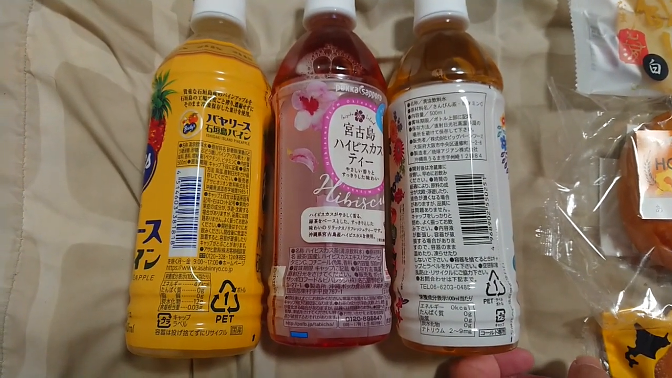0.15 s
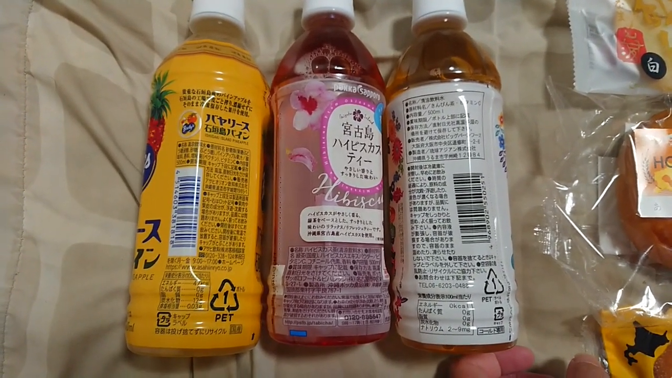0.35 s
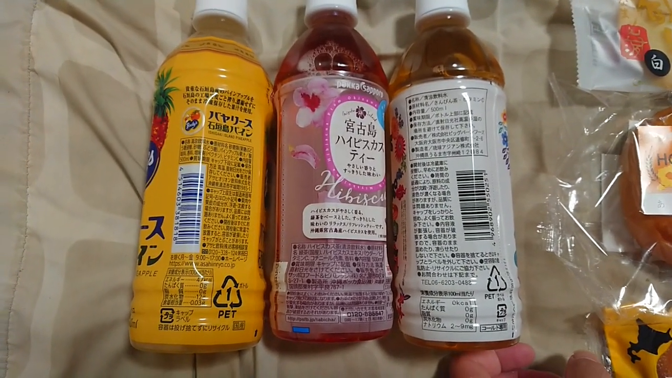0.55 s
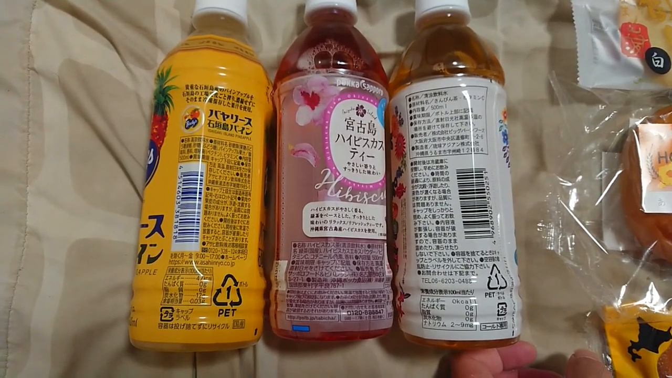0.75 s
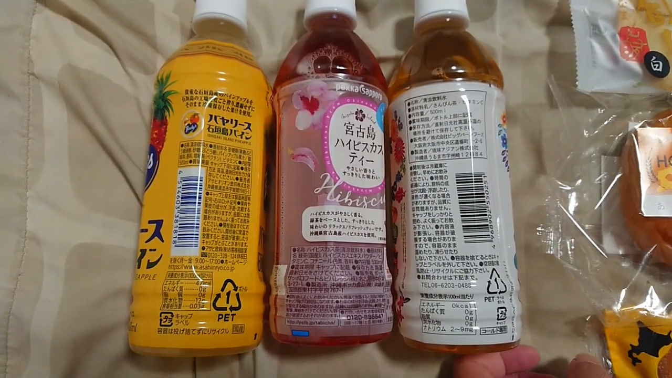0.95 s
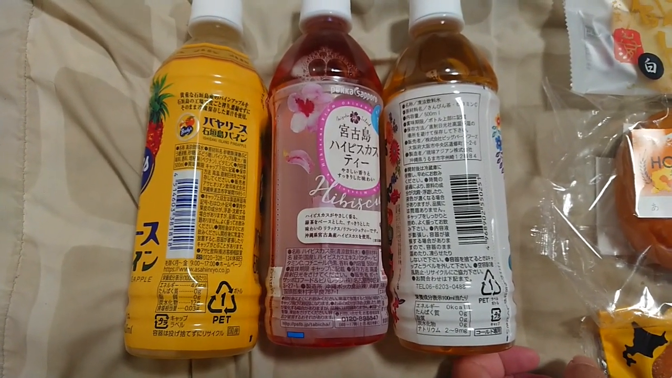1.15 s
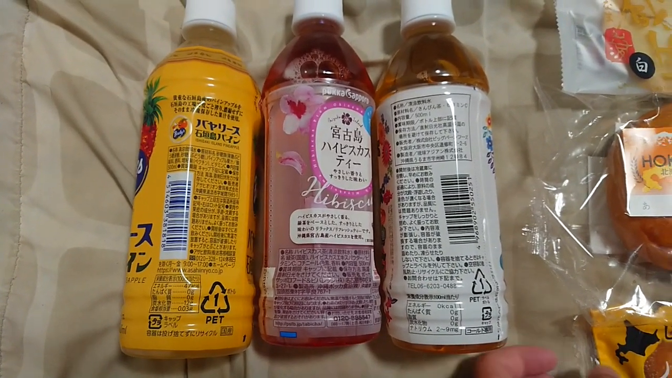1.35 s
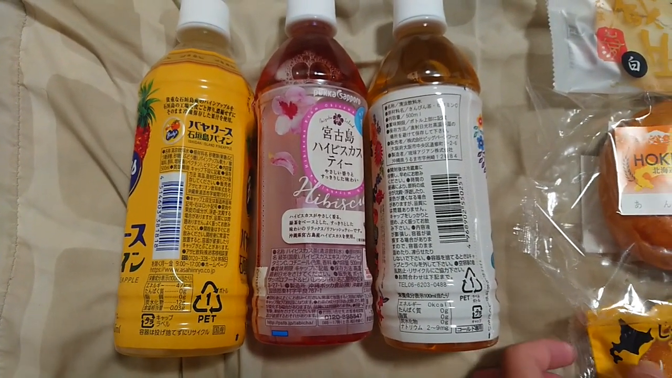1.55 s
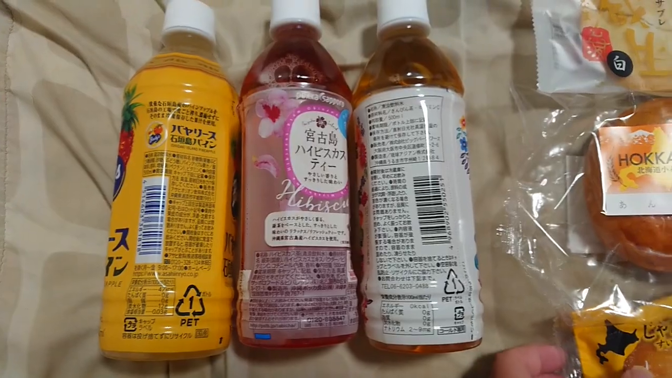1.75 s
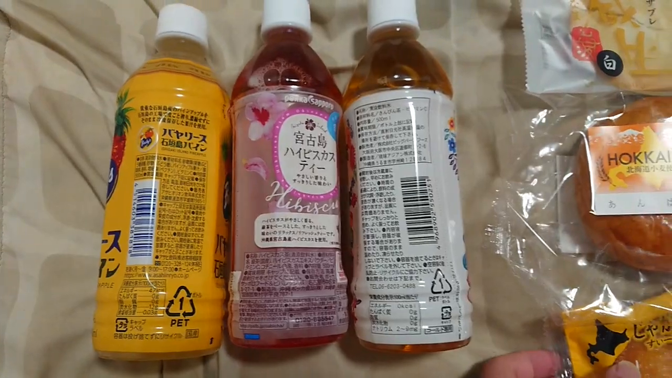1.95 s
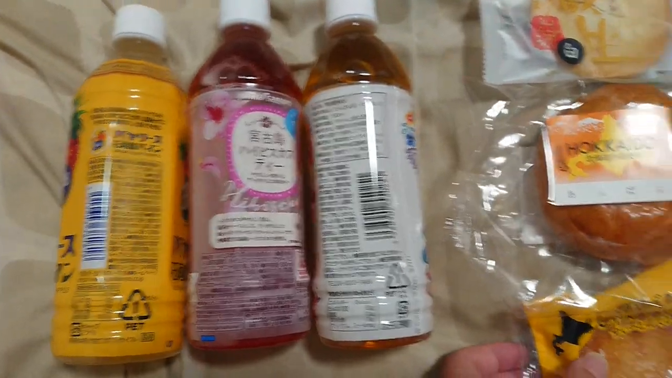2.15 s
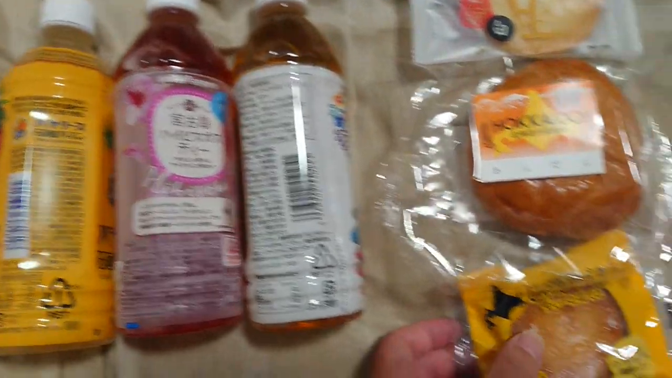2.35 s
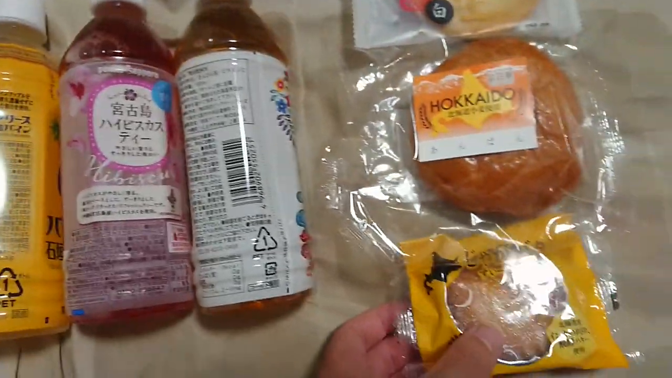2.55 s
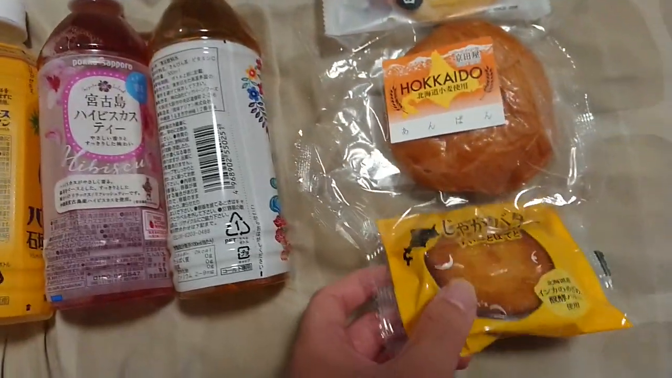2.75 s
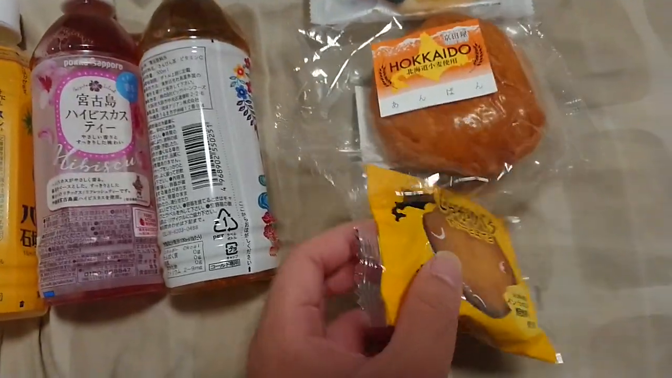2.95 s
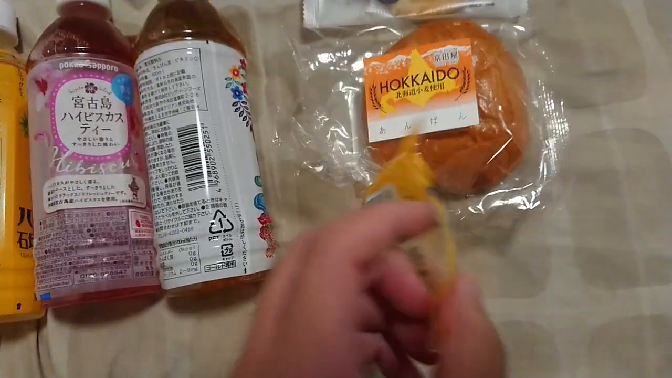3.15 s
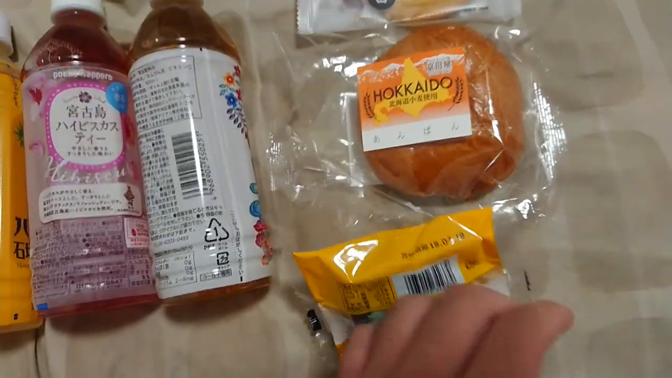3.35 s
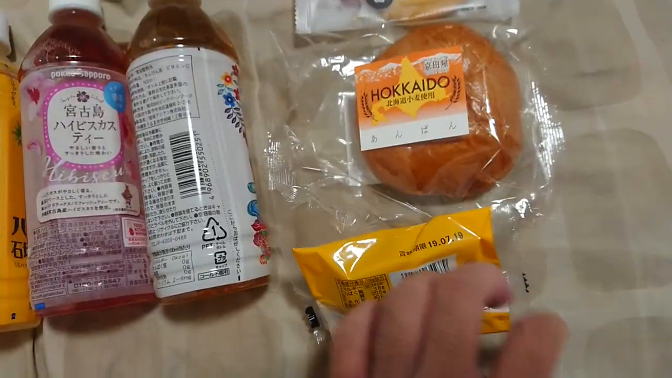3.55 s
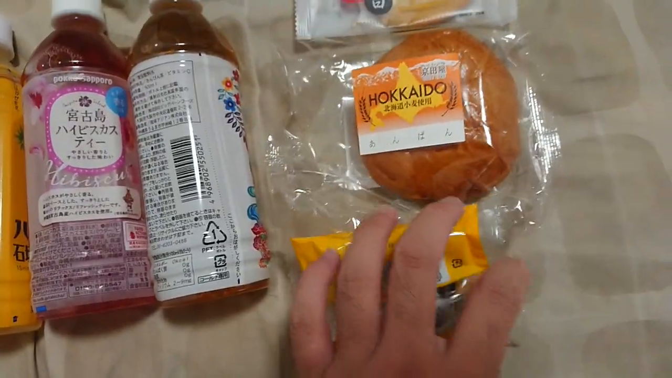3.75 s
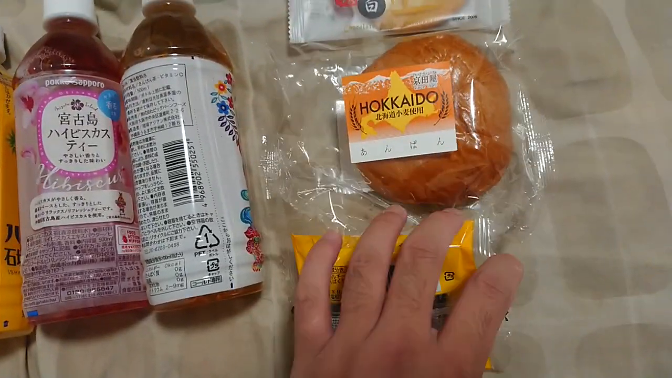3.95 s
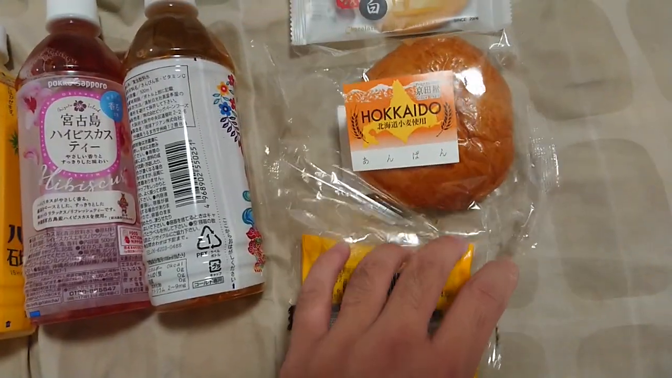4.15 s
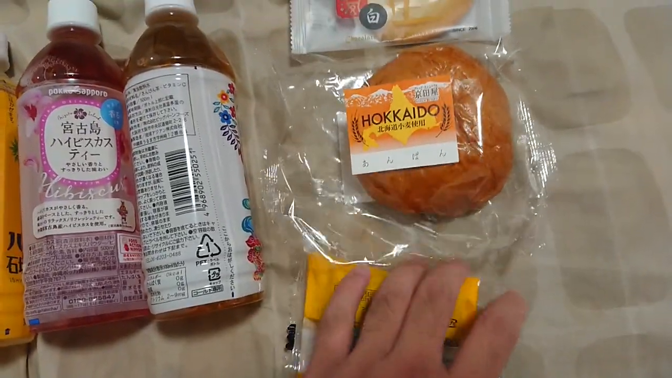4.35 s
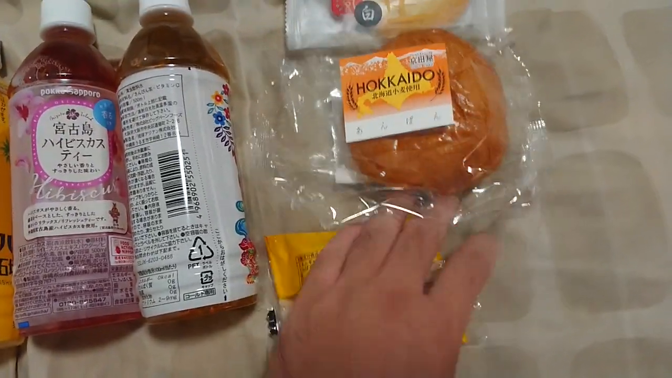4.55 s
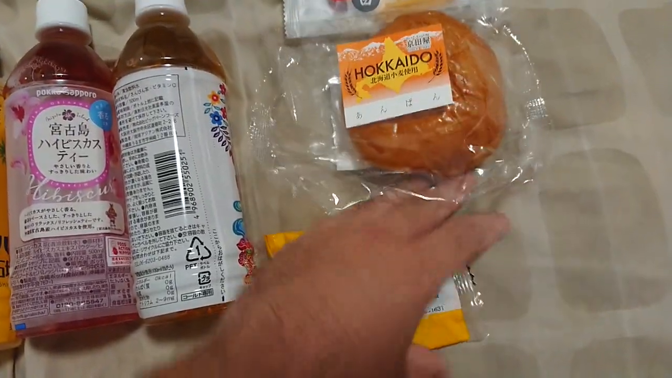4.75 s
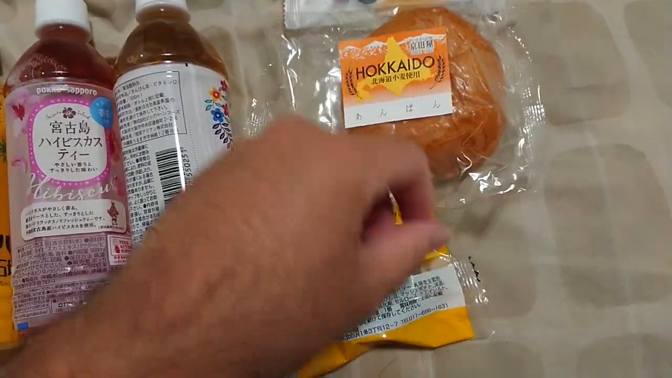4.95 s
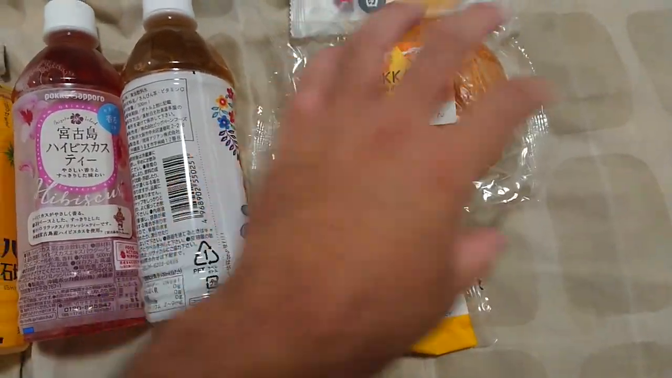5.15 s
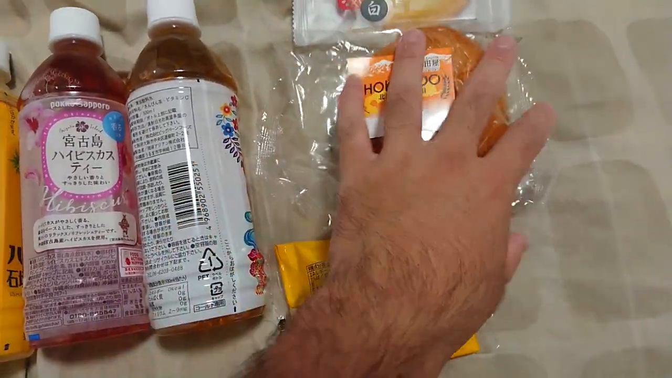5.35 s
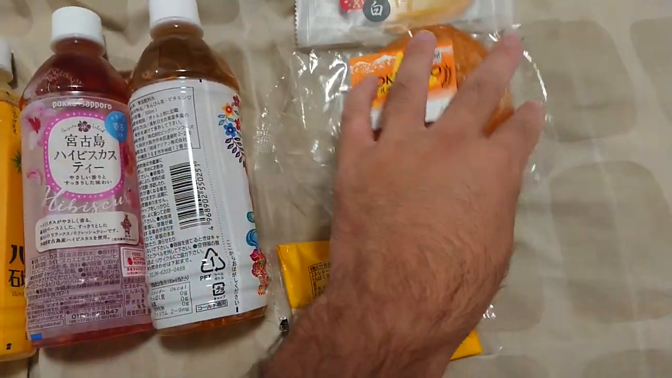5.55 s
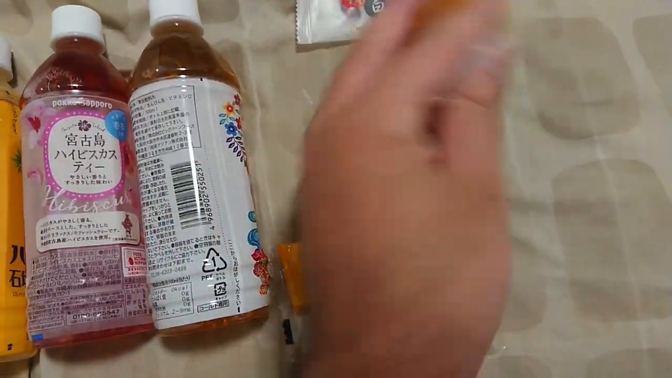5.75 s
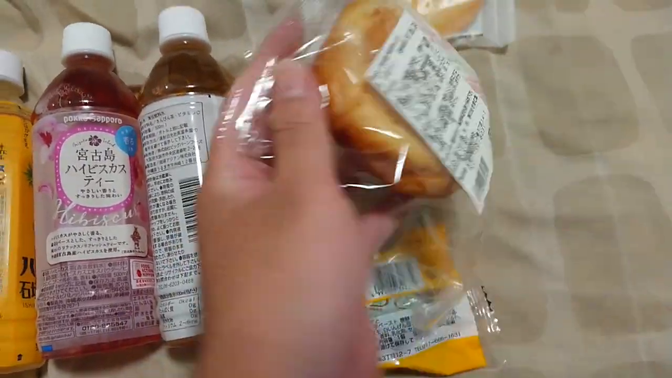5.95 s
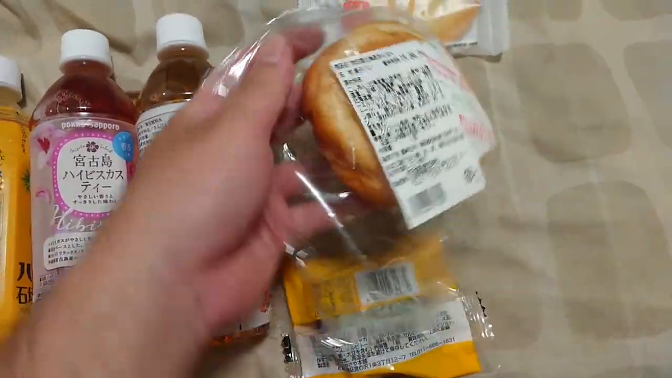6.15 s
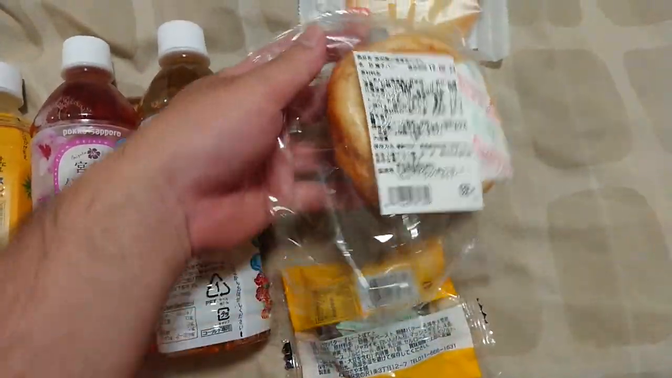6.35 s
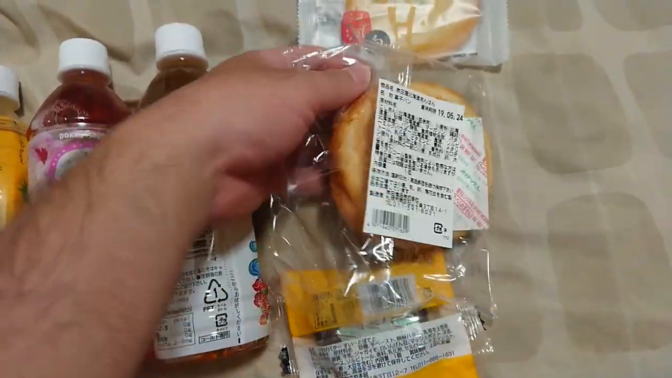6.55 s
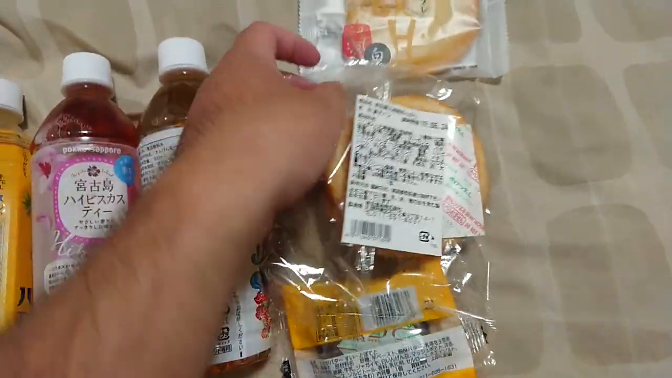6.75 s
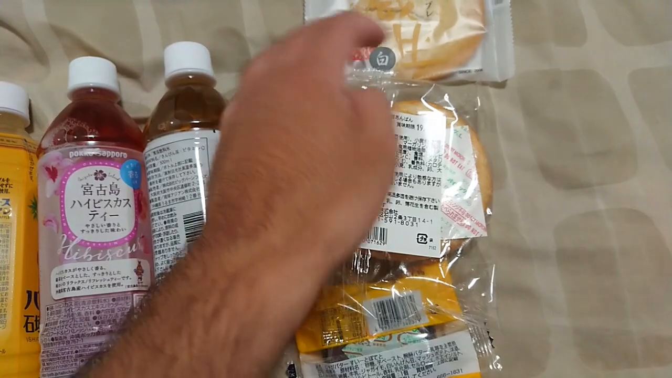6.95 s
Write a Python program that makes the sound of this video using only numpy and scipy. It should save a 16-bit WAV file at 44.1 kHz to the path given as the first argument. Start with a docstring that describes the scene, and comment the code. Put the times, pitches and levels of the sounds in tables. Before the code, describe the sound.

Close, dry crinkling of thin plastic packets on bedding. It starts nearly silent, a faint sliding hiss grows, then crisp snaps and fine crackle come in irregular clusters as a cake is turned and pressed. It nearly stops around five seconds, then a larger bag crackles fiercely with a tiny squeak, and thins out. Short room echoes; left microphone open, right one covered.

```python
"""Plastic film buckles in sharp snaps over a bed of fine crackle, as a hand turns over a wrapped small cake,
then grabs and flips a bun in a thin film bag. Each buckle is a short filtered burst of noise.
Filtered noise also makes the rubbing and a sliding hiss; gliding overtones make a fingertip squeak.
Swelling low tones are the packets bumping softly on the bedding. A small furnished room adds echoes,
faint rumble and hiss. The right microphone is almost completely covered, so it hears a muffled trace."""
import sys
import numpy as np
from scipy import signal
from scipy.fft import rfft, irfft
from scipy.io import wavfile
from scipy.ndimage import uniform_filter1d

SR = 44100
rng = np.random.default_rng(int(sys.argv[2]) if len(sys.argv) > 2 else 0)


def dump_mix(stems):
    """Bounce the given channels to the path in sys.argv[1] as a 16-bit WAV at rate SR."""
    frames = np.atleast_2d(stems).T  # one column per channel
    limited = np.clip(frames, -1, 1)  # hard clip at full scale
    pcm = np.round(limited * 32767).astype(np.int16)
    wavfile.write(sys.argv[1], SR, pcm)


N = 312669
TIME = np.arange(N) / SR   # seconds

# large, slack areas of film give off more bass: time_s [s], bass_lift_db [dB, relative]
SLACK_FILM = [(1.5, 29.5), (2.5, 21.5), (2.85, 15), (3.15, 12), (4.1, 9.5), (4.5, 12), (5.45, 11),
              (5.75, 14.5), (5.95, 15.5), (6.5, 11.5)]
# colour of the film noise at the open microphone: pitch_hz [Hz], level_db [dB per Hz, relative]
FILM_COLOUR = [(30, -17.5), (150, -4), (340, 0.5), (580, -4), (900, 0), (2200, 4.5), (4300, 8.5),
               (5600, 13), (6450, 0.5), (9000, 7.5), (12000, -1), (15500, -3.5)]


def from_db(db):
    """Decibels to gain."""
    return 10 ** (np.asarray(db) / 20)


def at_time(rows, s, axis=1):
    """One column of a table over time, joined by straight lines."""
    rows = np.array(rows)
    return np.interp(s, rows[:, 0], rows[:, axis])


def at_hz(rows, hz, axis=1):
    """One column of a spectrum, joined by straight lines on a log-frequency axis."""
    rows = np.array(rows)
    return np.interp(np.log(hz + 1), np.log(rows[:, 0]), rows[:, axis])


def bins(size):
    """Frequencies of a real Fourier transform, in Hz."""
    return np.arange(size // 2 + 1) * SR / size


def causal(db):
    """Minimum-phase response with the given gains: nothing sounds early."""
    cepstrum = irfft(np.log(from_db(db)))
    n, half = np.arange(cepstrum.shape[-1]), cepstrum.shape[-1] // 2
    # keep the first half doubled and drop the second half
    fold = 1 + np.sign(half - n) - (n == 0)
    return np.exp(rfft(cepstrum * fold))


def place(times, sounds):
    """Sum of short sounds, each starting at its own time."""
    starts = (np.asarray(times) * SR).astype(int)
    index = starts[:, None] + np.arange(sounds.shape[1])
    return np.bincount(index.ravel(), sounds.ravel(), N)[:N]


def room_tone(level_db=-59.5):
    """Low rumble and faint hiss: shaped noise, different at each microphone."""
    # spectrum of the quiet room: pitch_hz [Hz], open_db [dB per Hz, relative], covered_db [same]
    tone_colour = [(30, -17, -23), (48, -3, -14), (75, 0, -14), (150, -12.5, -25), (420, -37.5, -37),
                   (780, -27, -41), (1400, -32, -38), (2800, -47, -48), (6500, -60, -59), (9500, -50, -51),
                   (14000, -61, -59)]
    hz = bins(2 * N)
    colour = from_db([at_hz(tone_colour, hz), at_hz(tone_colour, hz, axis=2)])
    colour = colour * hz / (hz + 10)   # no steady offset
    noise = irfft(rfft(rng.standard_normal((2, 2 * N))) * colour)[:, :N]
    return from_db(level_db) * noise / noise[0].std()


def room(x, first_echo_s=0.0081, treble_loss_hz=16000, bass_hz=500, bass_t60_s=.27, level_db=-15.5):
    """Diffuse echoes arrive after a short gap and lose their treble first."""
    age = np.arange(SR // 2) / SR
    noise = rng.standard_normal(len(age)) * (age > first_echo_s)
    edges = np.geomspace(100, SR / 2, num=9)
    hz = np.fft.rfftfreq(len(age), 1 / SR)
    tail = 0
    for low, high in zip(edges, edges[1:]):
        band = irfft(rfft(noise) * ((hz >= low) & (hz < high)), len(age))
        loss = 1 + (low / treble_loss_hz) ** 2
        t60_s = bass_t60_s / loss   # time to fade by 60 dB
        fade = np.exp(-np.log(1000) * age / t60_s)
        band_gain = high / (high + bass_hz) / (1 + low / treble_loss_hz)
        tail = tail + band * fade * band_gain
    tail = tail / np.sqrt(np.sum(tail ** 2))
    return from_db(level_db) * signal.fftconvolve(x, tail)[:N]


def bumps(cycles=0.93):
    """Cushioned blows of hands and packets swell and die within a few cycles of a low tone."""
    # soft bumps: start_s [s], peak_db [dB], pitch_hz [Hz]
    bump_table = [(0.185, -37, 62), (2.063, -45, 66.6), (2.429, -41.5, 64), (3.311, -32.5, 303),
                  (4.208, -36, 376), (4.25, -33.5, 247), (4.437, -42.5, 62), (6.132, -34, 340)]
    start_s, peak_db, pitch_hz = np.transpose(bump_table)
    turns = pitch_hz[:, None] * np.arange(SR // 6) / SR
    swell = turns / cycles
    envelope = swell ** 2 * np.exp(2 - 2 * swell)   # reaches 1 when swell is 1
    return place(start_s, from_db(peak_db)[:, None] * envelope * np.sin(2 * np.pi * turns))


def slide(start_s=2.0, end_s=2.72, level_db=-65):
    """A fingertip strokes the cake wrapper: a narrow hiss at its resonance swells with the pressure."""
    # edges of the hiss: low_hz [Hz], high_hz [Hz]
    hiss_band = (4500, 5600)
    band_filter = signal.butter(2, np.sort(hiss_band), "band", fs=SR, output="sos")
    hiss = signal.sosfilt(band_filter, rng.standard_normal(N))
    pressure = np.clip((TIME - start_s) / (end_s - start_s), 0, 1) * (TIME < end_s)
    return from_db(level_db) * pressure ** 2 * hiss / hiss.std()


def squeak():
    """Fingertip skin sticks and slips unevenly on the bag; the slips carry faint overtones."""
    # path of the squeak: time_s [s], pitch_hz [Hz, before the wobble], level_db [dB, before the wobble]
    squeak_path = [(5.86, 740, -49), (5.95, 800, -47), (5.98, 610, -54), (6.0, 740, -43),
                   (6.011, 1020, -39), (6.021, 1070, -39), (6.04, 1350, -48)]
    wobble = uniform_filter1d(rng.standard_normal((2, N)), size=130)
    pace, grip = wobble / wobble.std()
    hz = at_time(squeak_path, TIME) * (1 + .035 * pace)
    phase = 2 * np.pi * np.cumsum(hz) / SR
    slips = sum(np.sin(k * phase) / k ** 2 for k in (1, 2, 3))
    touching = (TIME > squeak_path[0][0]) & (TIME < squeak_path[-1][0])
    loudness = from_db(at_time(squeak_path, TIME, axis=2)) * (1 + 1.24 * grip)
    return touching * loudness * slips


def effort_db(s, relax_db_per_s=335, rest_db=-100):
    """How hard the film is worked: every grip rises, holds and relaxes, and the firmest one leads."""
    # grips, pushes and turns of the hand: feel for the cake, lift and turn it, shift it on its back,
    # press it down, push it aside and let go, then grab the bun, flip it and lay it down:
    # start_s [s], rise_s [s], hold_s [s], level_db [dB of crackle]
    grip_table = [(1.518, 0.074, 0.018, -77), (1.65, 0.059, 0.76, -83), (2.29, 0.24, .1, -68.5),
                  (2.711, 0.0068, 0.1, -49), (2.832, 0.036, 0.11, -38.5), (2.996, 0.068, 0.068, -32),
                  (3.169, 0.026, 0.077, -40.5), (3.281, 0.023, 0.029, -30.5), (3.343, 0.022, 0.011, -40),
                  (3.605, 0.054, 0.008, -31.5), (3.704, 0.029, 0.052, -46), (3.836, 0.025, 0.047, -33.5),
                  (3.986, 0.017, 0.055, -31.5), (4.111, 0.059, 0.052, -32), (4.253, 0.022, 0.08, -44.5),
                  (4.375, 0.026, .16, -34.5), (4.665, 0.012, 0.058, -46), (4.78, 0.052, 0.053, -35.5),
                  (4.911, 0.0097, 0.015, -36), (5.337, 0.0047, 0.41, -37.5), (5.525, .07, 0.022, -32.5),
                  (5.625, 0.027, 0.069, -31), (5.754, 0.027, 0.16, -34), (5.984, 0.067, 0.0049, -32.5),
                  (6.096, 0.032, 0.011, -33.5), (6.214, 0.022, 0.1, -44.5), (6.365, 0.012, 0.084, -33.5),
                  (6.415, 0.079, 0.037, -26.5), (6.635, 0.021, 0.0057, -36.5), (6.731, 0.022, 0.12, -45),
                  (7.047, 0.007, 0.014, -31.5)]
    start_s, rise_s, hold_s, level_db = np.transpose(grip_table)[:, :, None]
    tightening = np.clip((s - start_s) / rise_s, 0, 1)
    relaxing_s = np.maximum(s - start_s - rise_s - hold_s, 0)
    held = from_db(level_db - relax_db_per_s * relaxing_s)
    return 20 * np.log10(np.max(tightening * held, axis=0) + from_db(rest_db))


def rubbing(level_db=-22.5, dull_hz=1500):
    """Skin and cloth slide on the film with a dull swish that follows the effort of the hand."""
    hz = bins(2 * N)
    colour = from_db(at_hz(FILM_COLOUR, hz)) / np.hypot(1, hz / dull_hz)
    swish = irfft(rfft(rng.standard_normal(2 * N)) * colour)[:N]
    coarse_s = TIME[::64]   # the effort changes slowly enough for a coarse grid
    work_db = np.interp(TIME, coarse_s, effort_db(coarse_s))
    return swish / swish.std() * from_db(work_db + at_time(SLACK_FILM, TIME) + level_db)


def buckles(times, pitch_hz, flutter, flutter_s, facet_db, bass_db, thin_hz, ring_db=3.0, ring_width=0.28,
            tilt_db=12.5, usual_hz=4900, slack_hz=1500, flip_s=0.0001886):
    """Each facet of film flips in two steps, flutters briefly and has its own resonances; unit energy."""
    grain = 512   # samples in the sound of one buckle
    damped_hz, damped_s = 7000, .0008   # above this pitch the flutter dies with this time constant
    shape_s, shape_db = .03, 2.6   # how long the creases keep a shape, and how strongly it colours
    # the top octave is stronger in loud passages and weaker in quiet ones
    top_hz, top_db_per_db, middle_level_db = 15500, .22, -46
    count, hz, age = len(times), bins(grain), np.arange(grain) / SR
    pitch_hz = np.asarray(pitch_hz)[:, None]
    chance = rng.standard_normal((count, 2, grain))
    first_step, wait = rng.random((count, 2)).T[:, :, None]
    # low pitches move the sheet as a whole, high ones its facets
    whole = 1 / (1 + (hz / slack_hz) ** 2)

    # bending waves scatter among the creases after the click, and a little lingers in the bag
    linger = .17 * np.exp(-age / .004)
    slow = rfft(chance[:, 0] * (np.exp(-age / flutter_s) + linger))
    fast = rfft(chance[:, 0] * (np.exp(-age / damped_s) + linger))
    lively = 1 / (1 + (hz / damped_hz) ** 4)
    scatter = lively * slow + (1 - lively) * fast
    push = 1 + whole + flutter * scatter * (1 - .5 * whole)
    # the crease gives a little, then snaps through a moment later
    snap_through = np.exp(-2j * np.pi * hz * flip_s * 2 * wait)
    push = push * (.5 * first_step * (1 - whole) + snap_through)

    # resonances of each facet, as random bumps in its spectrum
    facets = uniform_filter1d(uniform_filter1d(chance[:, 1, :len(hz)], size=8), size=6)
    facets = facet_db * np.tanh(facets / facets.std()) * (1 - whole)
    # all buckles of one moment share the resonances of the creases
    shapes = uniform_filter1d(rng.standard_normal((int(N / SR / shape_s) + 1, len(hz))), size=3)
    moment = (times / shape_s).astype(int)
    creases = shape_db * lively * (shapes / shapes.std())[moment]

    # small facets tick bright and broad, large ones pop with a clear low note
    distance = np.log((hz + 1) / pitch_hz) / ring_width
    ring = ring_db * usual_hz / pitch_hz * np.exp(-distance ** 2)
    tilt = tilt_db * np.log(pitch_hz / usual_hz)
    tilt = tilt * np.log(np.clip(hz, slack_hz, 2 * usual_hz) / usual_hz)
    # slack film adds bass, while thin film radiates its lowest pitches poorly
    bass = (at_time(SLACK_FILM, times)[:, None] + bass_db) * whole
    bass = bass - 20 * np.log10(np.hypot(1, thin_hz / (hz + hz[1])))
    above_middle_db = effort_db(times)[:, None] - middle_level_db
    top = top_db_per_db * above_middle_db * np.minimum(hz / top_hz, 1) ** 2

    colour_db = at_hz(FILM_COLOUR, hz) + facets + creases + ring + tilt + bass + top
    sounds = irfft(push * causal(colour_db))
    return sounds / np.sqrt(np.sum(sounds ** 2, axis=1, keepdims=True))


def crackle(most_per_s=1150, fewest_per_s=260, crowding=0.5, spread_db=8.5, pitch_hz=4800, pitch_spread=.27):
    """Small buckles of very uneven size come at random, crowding closer under a firmer grip."""
    step_s = .0008   # at most one buckle in each time slot
    slots = np.arange(0, N / SR, step_s)
    chance = rng.random((len(slots), 2))
    size, pitch = rng.standard_normal((2, len(slots)))
    s = slots + step_s * chance[:, 0]
    work_db = effort_db(s)
    per_s = np.maximum(fewest_per_s, most_per_s * from_db(crowding * (work_db - work_db.max())))
    happens = chance[:, 1] < per_s * step_s
    strength = from_db(spread_db * np.clip(size, -2, 2)) * happens
    # the hand feeds in energy steadily, however it is shared among the buckles
    strength = strength / np.sqrt(uniform_filter1d(strength ** 2, size=40) + 1e-6)
    sounds = buckles(s, pitch_hz * np.exp(pitch_spread * pitch), flutter=0.36, flutter_s=0.0012,
                     facet_db=4.0, bass_db=-1.5, thin_hz=170)
    gain = strength * np.sqrt(step_s * SR) * from_db(work_db)
    return place(s, sounds * gain[:, None])


def snaps(lift_db=0.5):
    """The loud buckles of taut film, one by one."""
    # buckles that stand out of the crackle:
    # start_s [s], level_db [dB over 1 ms, before the common lift], pitch_hz [Hz, centre]
    snap_table = [(2.057, -58, 4400), (2.3103, -41, 1530), (2.4457, -50, 2960), (2.511, -35, 3230),
                  (2.6297, -48.5, 1810), (2.724, -24.5, 2860), (2.73, -26.5, 3650), (2.782, -21.5, 3550),
                  (2.8318, -26.5, 7300), (2.8391, -26, 1380), (2.8723, -14.5, 4800), (2.8769, -23.5, 2730),
                  (2.935, -21, 4670), (2.9575, -22, 5850.0), (2.9764, -21.5, 3770), (3.0536, -21, 4700),
                  (3.0918, -16, 6100), (3.1088, -15.5, 5140), (3.1333, -17, 3300), (3.163, -21.5, 5300),
                  (3.1794, -27, 3870), (3.2166, -22.5, 7400), (3.2602, -23.5, 4750), (3.303, -19, 5200),
                  (3.325, -20, 5500), (3.338, -17, 3960.0), (3.4371, -23, 4830), (3.518, -35, 5530),
                  (3.649, -18, 4900), (3.719, -23, 4660.0), (3.7342, -20.5, 6740.0), (3.819, -26.5, 3800),
                  (3.8648, -13.5, 3560), (3.904, -24, 3300), (3.9924, -19.5, 4030), (4.015, -17.5, 4500.0),
                  (4.033, -16.5, 4800), (4.047, -13.5, 5540), (4.1352, -20, 5200), (4.1595, -22, 3120),
                  (4.1958, -18, 2530), (4.2564, -23.5, 5130), (4.3034, -27, 5930), (4.3352, -24.5, 5130.0),
                  (4.3813, -23, 5700), (4.4527, -21, 5600), (4.4806, -24, 5000), (4.5007, -22, 2880),
                  (4.629, -27, 3730), (4.7981, -27, 4230), (4.8297, -18.5, 2900), (4.8369, -19.5, 5070.0),
                  (4.936, -25, 3760), (5.027, -42, 4560), (5.1369, -30, 4500), (5.1367, -41, 1770),
                  (5.405, -27.5, 4550), (5.4534, -18, 5160.0), (5.473, -18.5, 5960), (5.511, -20, 5470),
                  (5.5203, -25, 5500), (5.5627, -19, 8500), (5.591, -20, 3230), (5.667, -16, 2980),
                  (5.6972, -18, 4410.0), (5.7212, -13, 7160), (5.7904, -19, 5250), (5.801, -18.5, 4700),
                  (5.82, -23, 4500), (5.8303, -18, 4500), (5.925, -23, 2920), (6.0019, -24.5, 4370),
                  (6.1365, -23, 3550.0), (6.2372, -24, 5400.0), (6.284, -29, 4260), (6.3351, -21, 4200),
                  (6.4132, -17, 3970), (6.4899, -16, 5500), (6.5445, -15, 5050), (6.62, -22, 5600),
                  (6.753, -28, 2160.0), (6.812, -26.5, 4570), (6.9031, -30.5, 5890.0)]
    start_s, level_db, pitch_hz = np.transpose(snap_table)
    millisecond = SR / 1000   # in samples
    sounds = buckles(start_s, pitch_hz, flutter=.28, flutter_s=.001, facet_db=3.5, bass_db=-10.0, thin_hz=750)
    gain = from_db(level_db + lift_db) * np.sqrt(millisecond)
    return place(start_s, sounds * gain[:, None])


def scene():
    """The open left microphone hears everything; the covered right one gets only a muffled trace."""
    # what still reaches the covered microphone: pitch_hz [Hz], gain_db [dB]
    covered_gain = [(60, -20.5), (300, -40.5), (1500, -58.5)]
    film = snaps() + crackle() + rubbing() + slide() + squeak()
    left = film + room(film) + bumps()
    muffle = irfft(causal(at_hz(covered_gain, bins(size=4096))))
    right = signal.fftconvolve(left, muffle)[:N]
    return np.array([left, right]) + room_tone()


def record(dry, cutoff_hz=16150):
    """A steep low-pass filter cuts the top."""
    return signal.sosfilt(signal.ellip(10, .1, 80, cutoff_hz, fs=SR, output="sos"), dry)


dry = scene()
out = record(dry)
dump_mix(out)
```